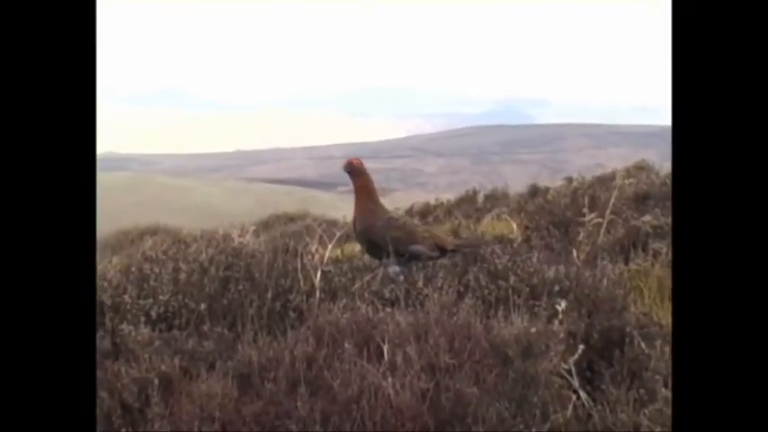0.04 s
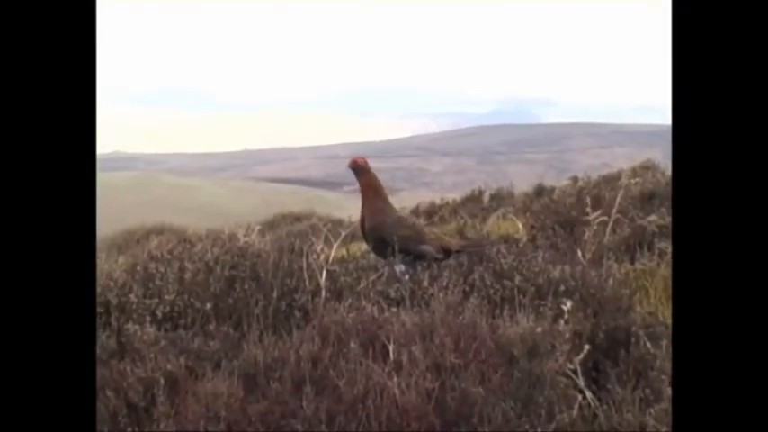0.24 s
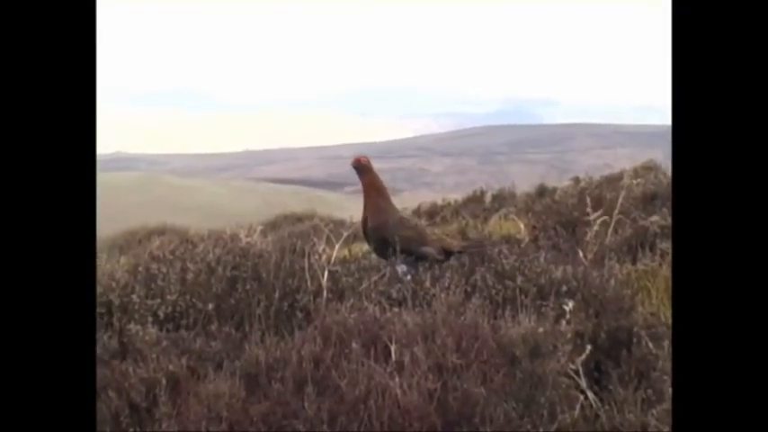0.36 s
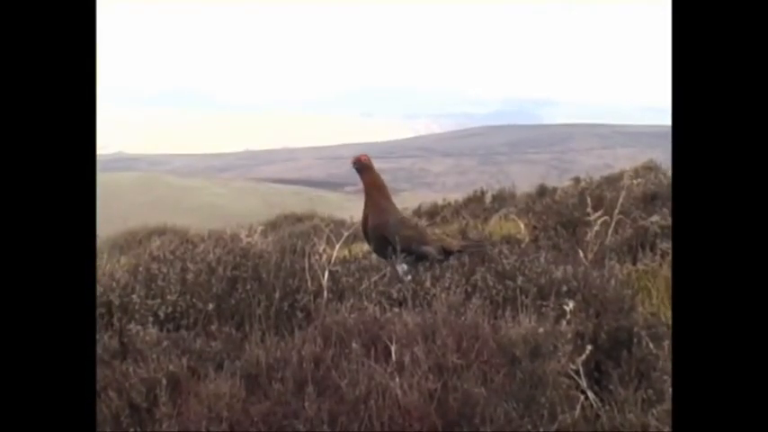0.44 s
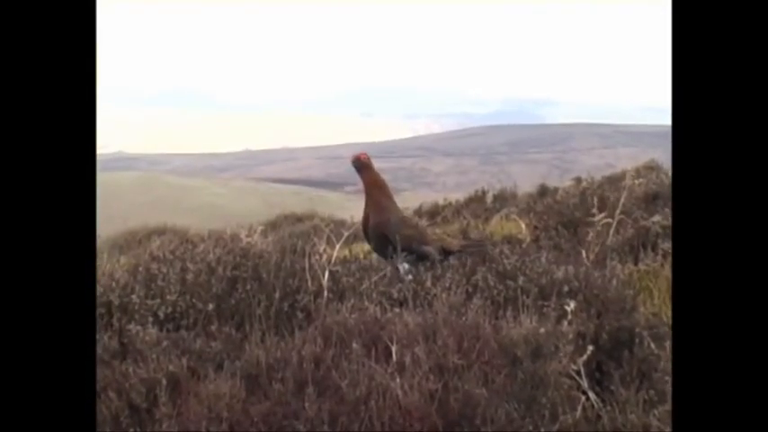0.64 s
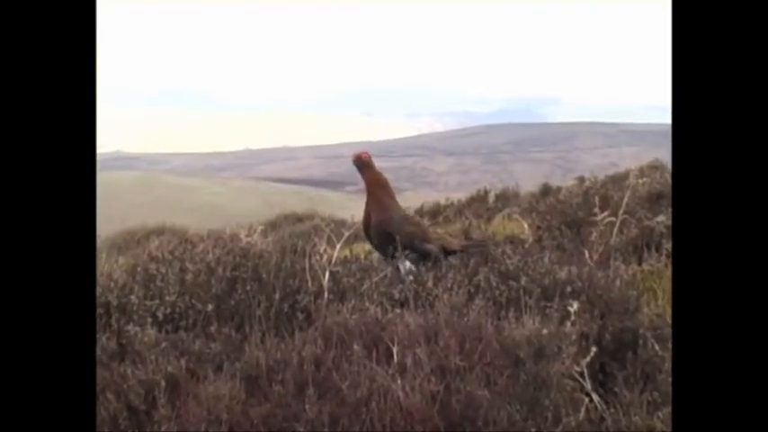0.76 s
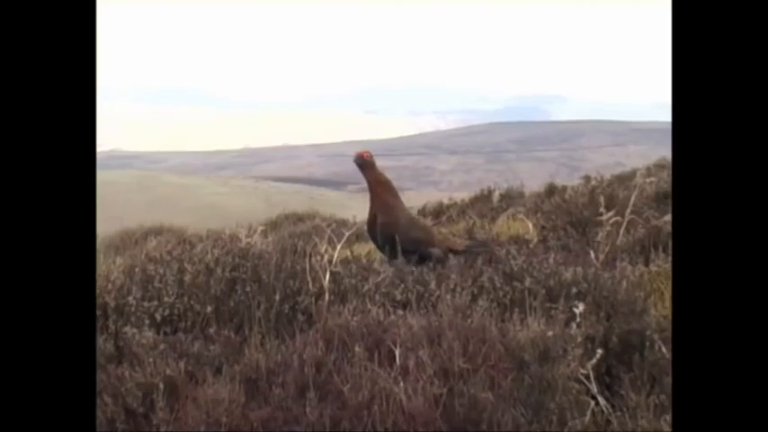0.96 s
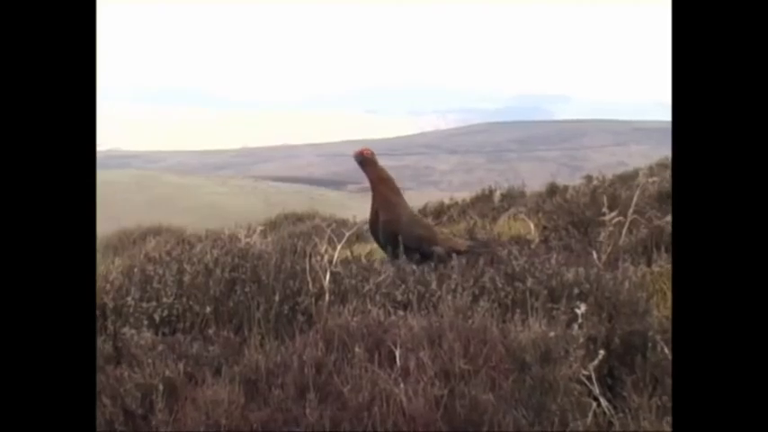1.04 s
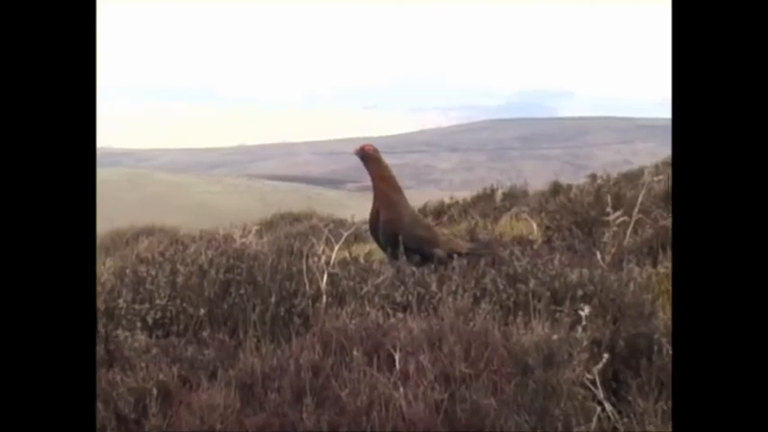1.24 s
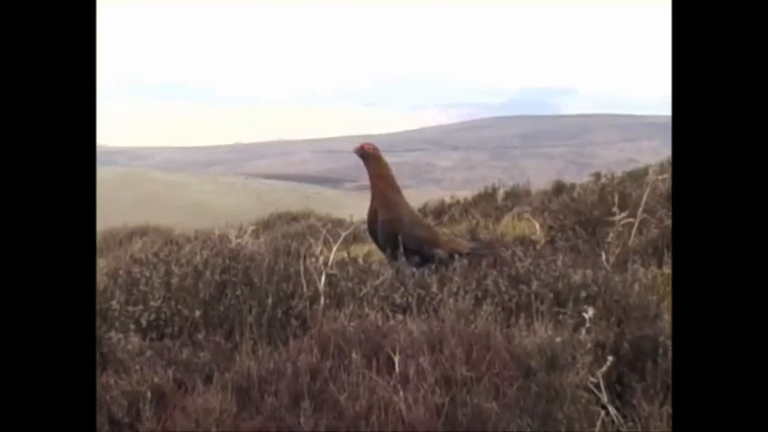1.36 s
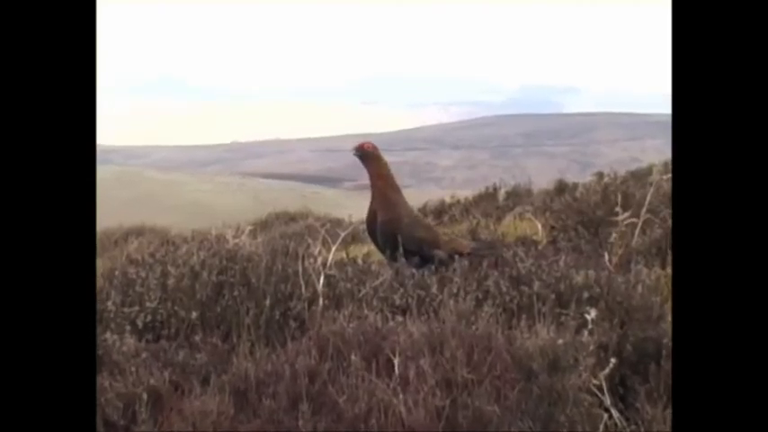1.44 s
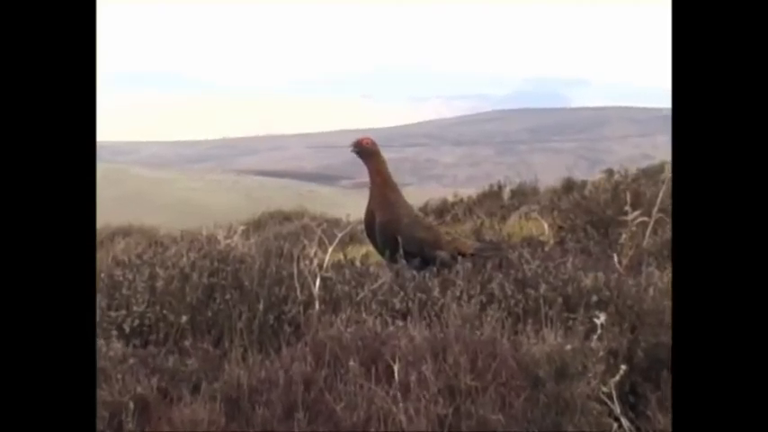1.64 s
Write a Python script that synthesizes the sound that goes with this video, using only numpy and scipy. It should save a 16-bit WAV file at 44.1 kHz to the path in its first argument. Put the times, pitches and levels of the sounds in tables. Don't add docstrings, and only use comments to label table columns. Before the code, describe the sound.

Outdoors in heather, one grouse croaks rapidly, each croak a short burst of pulses, growing brighter and faster before a muffled grunt; nearly dry sound, light wind, faint microphone-side hum and small clicks.

```python
import sys
import numpy as np
from scipy import signal
from scipy.fft import rfft, irfft
from scipy.io import wavfile
from scipy.ndimage import uniform_filter1d

SR = 44100
rng = np.random.default_rng(int(sys.argv[2]) if len(sys.argv) > 2 else 0)


def field_ratio(decibels):
    return 10 ** (np.asarray(decibels, dtype=float) / 20)


def digitize_waveform(pressure):
    field = np.atleast_2d(pressure).T
    bounded = np.clip(field, -1, 1)
    quanta = np.round(bounded * 32767).astype(np.int16)
    wavfile.write(sys.argv[1], SR, quanta)


N = 74970

# (strongest pulse [s], level [dB], fast period [ms], last period [ms], brightness [dB])
CROAKS = [(.1009, -14, 6.8, 10.2, -1), (.2391, -13.5, 6.55, 8.3, 0), (.3636, -14.5, 6.45, 8.7, 0),
          (.4776, -14.5, 6.15, 7.9, 2), (.5823, -14.5, 5.75, 7.0, 3), (.6790, -14.5, 5.65, 7.4, 2),
          (.7708, -15, 6.0, 8.3, -2), (.8573, -15, 5.9, 6.4, -1), (.9383, -15, 5.9, 6.6, -4),
          (1.0197, -15.5, 6.2, 7.7, -4), (1.1003, -15.5, 6.0, 7.7, -5), (1.1826, -15, 6.35, 8.2, -2)]
PULSE_COUNTS = [7] * 7 + [6] * 5
WARM_UP_S, SLOW_MS = 0.33, (6.4, 7.35)
LEAD_IN_DB, LEAD_DULL_DB, FADE_DB, FADE_POWER = -9, -3.5, -0.2121, 2.28
LAST_RING_S, SCATTER_DB, DETUNE = 0.009, 1.5, 0.02
RASP_DB, RASP_BAND_HZ, RASP_S = -13, (1481.5, 9888), 0.0018


def croaks():
    out, rasp = np.zeros(N), np.zeros(N)
    for (peak_s, db, fast_ms, last_ms, bright_db), count in zip(CROAKS, PULSE_COUNTS):
        chance = np.clip(rng.standard_normal((8, 14)), -2, 2)
        warm = 1 - np.exp(-peak_s / WARM_UP_S)
        slow_ms = blend(SLOW_MS, warm)
        gaps_s = np.array([slow_ms, slow_ms + 0.2] + [fast_ms] * (count - 4) + [last_ms]) / 1000
        times = peak_s - gaps_s[0] + np.r_[0, np.cumsum(gaps_s)]
        for k, at in enumerate(times):
            is_last = k == count - 1
            late = max(k - 1, 0)
            tune, vary_db = 1 + DETUNE * chance[k, :7], SCATTER_DB * chance[k, 7:]
            dull_db = LEAD_DULL_DB * (k == 0)
            level = db + (LEAD_IN_DB if k == 0 else FADE_DB * late ** FADE_POWER * 6 / count)
            level -= 1.1 * (last_ms - fast_ms) * is_last
            until_s = LAST_RING_S if is_last else gaps_s[k] - CHOKE_S
            throat_and_beak(out, at, k, warm, level, dull_db, tune, vary_db, until_s)
            upper_tract(out, at, late, warm, level, bright_db + 5 * dull_db, tune, vary_db, until_s)
            rasp_db = level + bright_db + 4 * dull_db - 4 * (k == 1) - 3 * late + 2 * vary_db[2]
            strike(rasp, at, 1 / (4 * RASP_S), rasp_db, 6 * RASP_S)
            if not is_last:
                snap(out, rasp, times[k + 1], k, warm, level, bright_db, dull_db, tune, vary_db)
    band = signal.butter(2, RASP_BAND_HZ, "band", fs=SR, output="sos")
    air = signal.sosfilt(band, rng.standard_normal(N))
    return out + field_ratio(RASP_DB) * np.abs(rasp) * air


TAUT_HZ, SLACK_HZ, THROAT_RING_S = (908, 816), 660, (0.055, 0.018)
SLACK_FROM_PULSE, SLACK_PULSES = (2.12, 0.92), 1.89
BEAK_HZ, BEAK_RING_S, OPENING_PER_PULSE = (1357, 1910), (0.024, 0.013), 0.75
BEAK_GAIN_DB, BEAK_FADE_DB = -5, (-5, -1)
PIPE_HZ, PIPE_SAG_HZ, PIPE_DB, PIPE_T60_S = (3496, 2356), -90, (-21.5, -8.5), 0.022


def throat_and_beak(out, at, k, warm, level, dull_db, tune, vary_db, until_s):
    late = max(k - 1, 0)
    slack = np.clip((k - blend(SLACK_FROM_PULSE, warm)) / SLACK_PULSES, 0, 1)
    throat_hz = blend((blend(TAUT_HZ, warm), SLACK_HZ), slack) * tune[0] ** 0.5
    strike(out, at, throat_hz, level + vary_db[0] / 4, blend(THROAT_RING_S, slack), until_s)
    opening = min((k * warm * OPENING_PER_PULSE) ** 2, 1)
    beak_db = level + BEAK_GAIN_DB + dull_db + vary_db[1] + late * blend(BEAK_FADE_DB, warm)
    strike(out, at, -blend(BEAK_HZ, opening) * tune[1], beak_db, blend(BEAK_RING_S, opening), until_s)
    pipe_hz = (blend(PIPE_HZ, warm) + PIPE_SAG_HZ * late) * tune[2]
    pipe_db = level + blend(PIPE_DB, warm) - 2.4 * late + 4 * dull_db + vary_db[2]
    strike(out, at, pipe_hz, pipe_db, PIPE_T60_S, until_s)


# (frequency [Hz], level [dB], t60 [s], fade [dB/pulse])
UPPER = [(4192, -12.5, 0.015, -14.5), (6695, -20.5, 0.021, -19), (356, -27.5, 0.01, -2),
         (148, -40, 0.024, -20)]


def upper_tract(out, at, late, warm, level, bright_db, tune, vary_db, until_s):
    for j, (hz, mode_db, t60, fade_db) in enumerate(UPPER):
        shine_db = bright_db + blend((-14, 0), warm) if hz > 1000 else 0
        early_fade_db = blend((-fade_db * 0.4, fade_db), warm)
        faded_db = early_fade_db * min(late, 2) + fade_db * max(late - 2, 0)
        glide = 1 + blend((0.09, 0), warm) * (late - 1) * (j == 0)
        mode_hz = hz * glide * tune[3 + j] ** 0.5
        strike(out, at, mode_hz, level + mode_db + shine_db + faded_db + vary_db[3 + j], t60, until_s)


SNAP_BEFORE_MS, SNAP_HZ, SNAP_DB, SNAP_T60_S = 2.298, (2590, 2355), -3, 0.0051
SNAP_HIGH_HZ, SNAP_HIGH_DB = 4690, -8


def snap(out, rasp, next_pulse_s, k, warm, level, bright_db, dull_db, tune, vary_db):
    at = next_pulse_s - SNAP_BEFORE_MS / 1000
    if k == 0:
        step_db = blend((-20, -2), warm)
    else:
        step_db = -1.5 * k + blend((-6, 0), warm) * (k == 1)
    db = level + vary_db[4] + step_db
    hz = (blend(SNAP_HZ, warm) - 60 * max(k - 1, 0)) * tune[5]
    strike(out, at, hz, db + SNAP_DB, SNAP_T60_S)
    high_db = db + SNAP_HIGH_DB + blend((6, -6), warm) + bright_db - 2.7 * k
    strike(out, at, SNAP_HIGH_HZ * tune[6], high_db, SNAP_T60_S)
    puff_db = db + bright_db + 2 * dull_db - 2 * k + 2 * vary_db[1]
    strike(rasp, at, 1 / (4 * RASP_S), puff_db, 6 * RASP_S)


# (first pulse [s], period [ms], level [dB], throat [Hz], upper [Hz], upper [dB], t60 [s])
GRUNT = (1.2956, 8.6, -24, 640, 1200, -9, .033)
GRUNT_STEPS_DB = (-18, -1.5, 0, 0, -4.5)


def grunt():
    out = np.zeros(N)
    first_s, period_ms, db, hz, up_hz, up_db, t60 = GRUNT
    until_s = period_ms / 1000 - CHOKE_S
    for k, step_db in enumerate(GRUNT_STEPS_DB):
        delay_ms = 1.2 * (k == 4) + 3.8 * (k == 0)
        at = first_s + ((k - 1) * period_ms + delay_ms) / 1000
        strike(out, at, hz, db + step_db, t60, until_s)
        strike(out, at, -up_hz, db + step_db + up_db, t60 / 3, until_s)
        strike(out, at, 230, db + step_db - 21, t60 / 2, until_s)
    return out


def blend(pair, share):
    return pair[0] + (pair[1] - pair[0]) * share


RISE_S, CHOKE_S = 0.00023, 0.0012


def strike(out, start_s, hz, db, t60, until_s=1.0):
    i, length = int(start_s * SR), 2600
    t = np.maximum((np.arange(i, i + length) + 1) / SR - start_s, 0)
    rise = (1 - np.exp(-t / RISE_S)) ** 2
    decay = np.exp(-np.log(1000) * t / t60 - np.maximum(t - until_s, 0) / CHOKE_S)
    out[i + 1:i + 1 + length] += field_ratio(db) * rise * decay * np.sin(2 * np.pi * hz * t)


# (frequency [Hz], left lead [rad])
BIRD_PHASE = [(0, 0), (520, 0.55), (2070, -0.37), (3790, 0.8), (5860, -0.0053), (6460, -2.64),
              (7320, 0.024), (8700, 0.98), (9220, 1), (12600, -0.56), (13400, 0.24), (14100, -0.2),
              (14600, 0.43), (15800, -0.1)]
# (frequency [Hz], left minus right [dB])
BIRD_BALANCE = [(170, -2.5), (700, 2), (1700, 2), (2400, -6), (3100, -5), (4200, 2.5), (5500, 2),
                (8300, -2)]
ECHO_DB, ECHO_T60_S = -27, 0.05


def across_heather(x):
    t = np.arange(4410) / SR
    echo = rng.standard_normal((2, len(t))) * np.exp(-np.log(1000) * t / ECHO_T60_S)
    echo /= np.sqrt(np.sum(echo[0] ** 2))
    hz = np.fft.rfftfreq(N, 1 / SR)
    half = field_ratio(at_hz(BIRD_BALANCE, hz) / 2) * np.exp(0.5j * at_hz(BIRD_PHASE, hz))
    direct = irfft(rfft(x) * np.array([half, 1 / half]), N)
    return direct + field_ratio(ECHO_DB) * signal.fftconvolve(x[None], echo, axes=1)[:, :N]


def at_hz(points, hz):
    p = np.array(points, float)
    return np.interp(np.log(np.maximum(hz, 1)), np.log(p[:, 0]), p[:, 1])


# (frequency [Hz], density [dB/Hz])
WIND_MID = [(12, -64), (20, -23.5), (91, -0.5), (193, -13.5), (319, -8), (558, -16), (4300, -26),
            (5230, -27.5), (16000, -32.5)]
# (frequency [Hz], density [dB/Hz])
WIND_SIDE = [(26, -56), (45, -29), (75, -20), (114, -15), (150, 5.5), (391, -16.5), (4460, -24),
             (5290, -25), (16000, -32)]
WIND_MID_DB, WIND_SIDE_DB, GUST_DB, FLICKER_DB = -56, -55, 0.8, 1.5


def wind():
    hz, gust, pair = np.fft.rfftfreq(N, 1 / SR), walk(2.1), []
    octave = np.log2(np.maximum(hz, 1) / 20)
    for points, db in ((WIND_MID, WIND_MID_DB), (WIND_SIDE, WIND_SIDE_DB)):
        spec = rfft(rng.standard_normal(N)) * field_ratio(at_hz(points, hz)) * (hz > 15)
        out = np.zeros(N)
        for k in range(11):
            share = np.clip(1 - np.abs(octave - k), 0, 1)
            swell_db = GUST_DB * gust + FLICKER_DB * walk(12.3) / (1 + k / 4)
            out += irfft(spec * share, N) * field_ratio(swell_db)
        pair.append(out * field_ratio(db) / np.std(out))
    mid, side = pair
    return np.array([mid + side, mid - side])


def walk(rate_hz):
    k = int(SR / rate_hz)
    held = np.repeat(rng.standard_normal(N + 1)[:N // k + 1], k)
    return 0.46 * uniform_filter1d(uniform_filter1d(held, k), k)[:N]


# (frequency [Hz], level [dB])
MOTOR = [(96.9, -73), (317.6, -73.5), (4802, -77), (5103, -107), (5405, -71.5), (5701, -80)]
WOBBLE_RAD, SIDE_RAD = 1.2, 0.3


def motor():
    t, out = np.arange(N) / SR, np.zeros((2, N))
    for hz, db in MOTOR:
        phase = 2 * np.pi * hz * t + WOBBLE_RAD * walk(9.5) + np.array([[SIDE_RAD], [-SIDE_RAD]])
        out += np.sqrt(2) * field_ratio(db + 3.7 * walk(10.3)) * np.sin(phase)
    return out


# (time [s], level [dB], frequency [Hz], length [s])
TICKS = [
    (.004, -60, 1950, 0.0052),
    (0.029, -62.5, 8000, 0.0036),
    (0.182, -64, 5100, 0.0024),
    (0.32, -56, 6600, 0.0016),
    (0.403, -51, 6500, 0.00091),
    (0.405, -63, 6900, 0.00064),
    (.737, -44, 600, 0.0033),
    (0.753, -57.5, 403, 0.0044),
    (1.44, -56.5, 870, 0.0023),
]


def handling():
    out = np.zeros((2, N))
    for at, db, hz, length_s in TICKS:
        band = signal.butter(2, [hz / 2.4, hz * 1.2], "band", fs=SR, output="sos")
        noise = signal.sosfilt(band, rng.standard_normal((2, 4096)))
        i, u = int(at * SR), np.arange(4096) / SR / length_s
        burst = u * np.exp(1 - u) * (noise[0] + 1.2 * noise) / np.std(noise)
        out[:, i:i + 4096] += field_ratio(db) * burst
    return out


def scene():
    return across_heather(croaks() + grunt()) + wind() + motor() + handling()


def roll_off(x):
    return signal.sosfilt(signal.butter(12, 16300, fs=SR, output="sos"), x)


def record(dry):
    low_pass = signal.ellip(10, 0.2, 70, 15850, fs=SR, output="sos")
    mix = signal.sosfilt(low_pass, dry)
    return roll_off(mix)


dry = scene()
out = record(dry)
digitize_waveform(out)
```